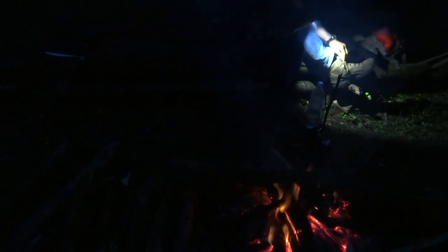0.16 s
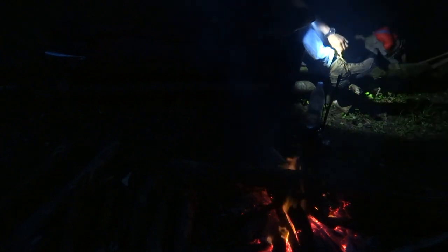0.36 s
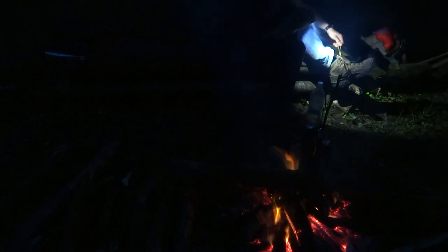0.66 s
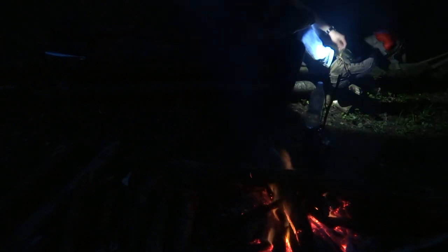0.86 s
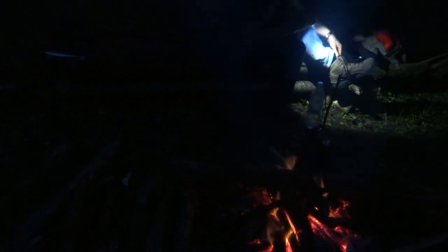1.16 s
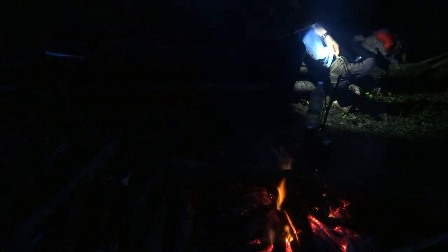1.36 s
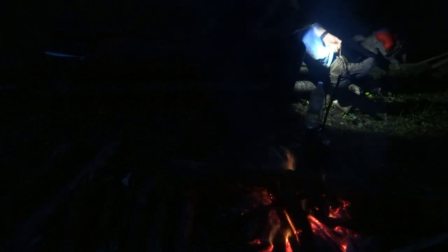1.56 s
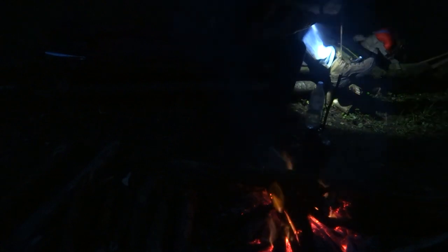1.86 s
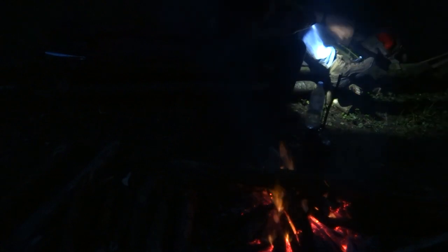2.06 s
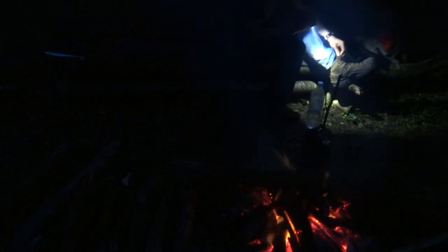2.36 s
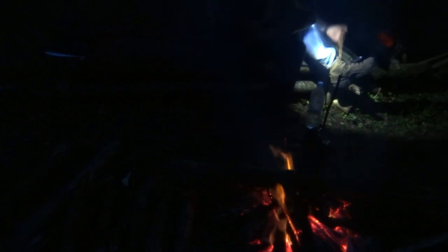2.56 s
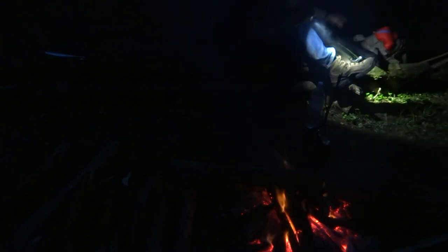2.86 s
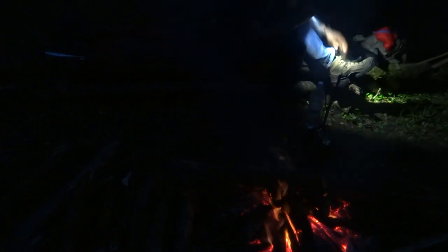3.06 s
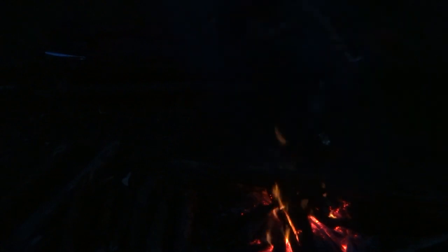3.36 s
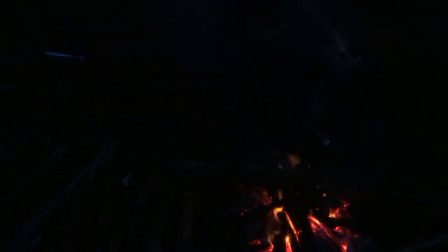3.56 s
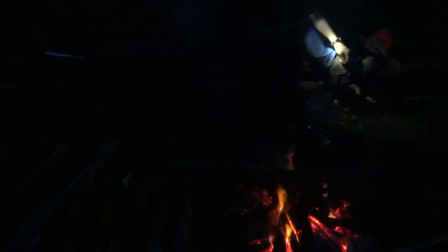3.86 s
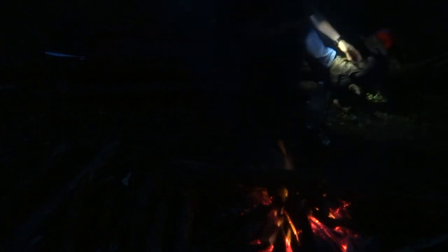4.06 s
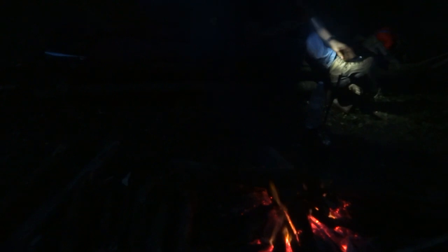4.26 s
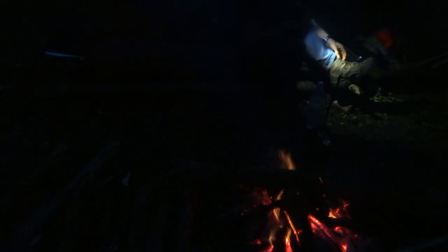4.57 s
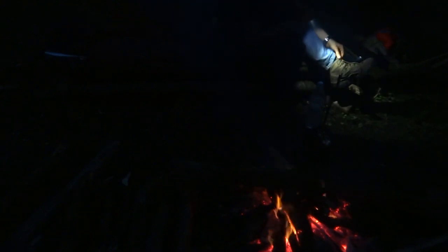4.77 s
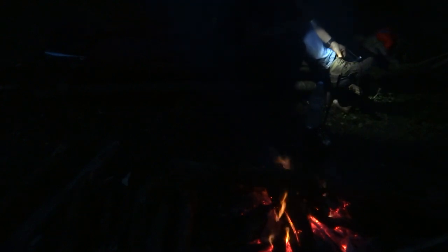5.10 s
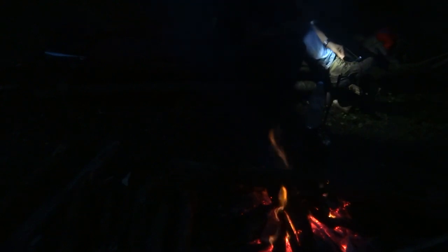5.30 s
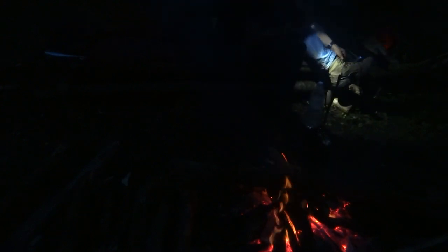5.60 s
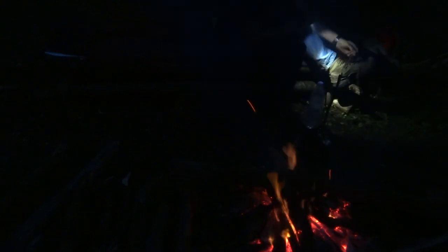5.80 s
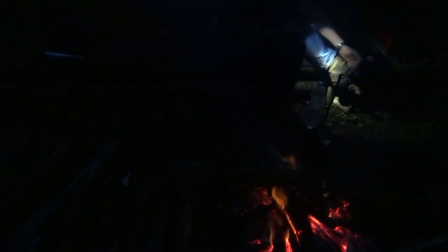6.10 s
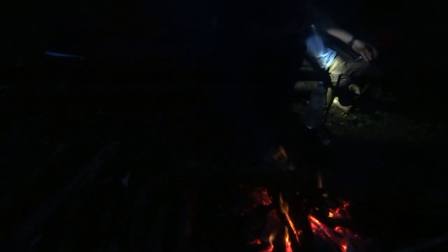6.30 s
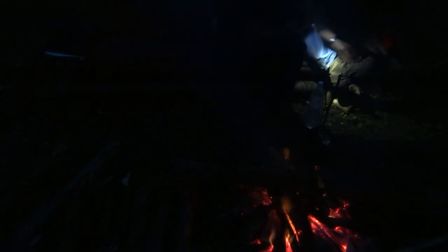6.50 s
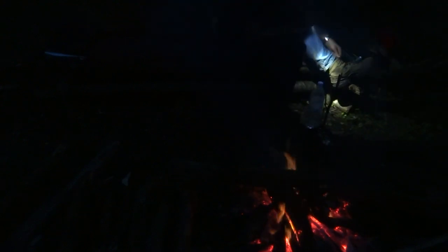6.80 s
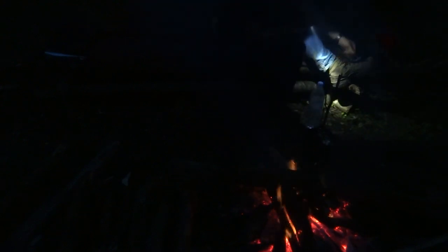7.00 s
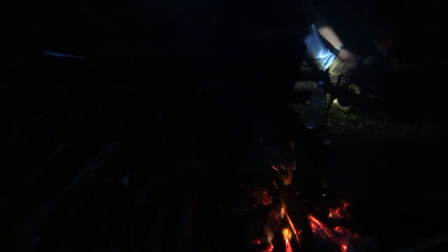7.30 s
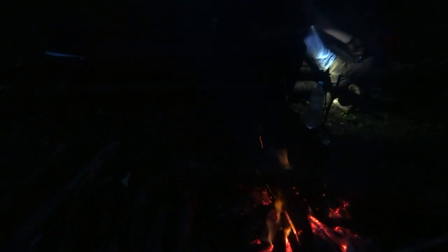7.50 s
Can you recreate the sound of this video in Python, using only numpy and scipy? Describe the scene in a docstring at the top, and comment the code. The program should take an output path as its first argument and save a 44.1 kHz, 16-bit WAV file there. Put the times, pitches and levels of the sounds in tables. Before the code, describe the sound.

A bird sings gliding, two-voiced whistles among echoing trees at night, beside a crackling fire with one very loud pop near the end.

```python
"""Dusk by a campfire in a wood: damp logs hiss, tick and pop close by; far off a nightjar churrs and an engine drones.
A far thrush on the right opens, mostly heard as scatter off the trunks; someone by the fire knocks and scuffs.
From about two to five seconds a near thrush on the left sings gliding, sometimes two-voiced notes.
The far thrush then takes over, and near seven seconds the loudest pop comes with a few more knocks.
Whistles are gliding sines, pops and knocks short rings and noise bursts, hiss and night air coloured noise."""
import sys
import numpy as np
from scipy import signal
from scipy.fft import rfft, irfft, next_fast_len
from scipy.io import wavfile
from scipy.ndimage import map_coordinates

SR = 44100
rng = np.random.default_rng(int(sys.argv[2]) if len(sys.argv) > 2 else 0)


def wav_out(sig):
    """Save sig, one row per channel (or a flat mono array), as 16-bit PCM at SR to the path in sys.argv[1]."""
    wavfile.write(sys.argv[1], SR, np.round(np.clip(np.atleast_2d(sig).T, -1, 1) * 32767).astype(np.int16))


N = 337365


def amp(db):
    """Decibels to gain."""
    return 10 ** (np.asarray(db) / 20)


def unit(x):
    """Scale to rms 1."""
    return x / np.sqrt(np.mean(x ** 2) + 1e-20)


def along(points, hz):
    """Read (frequency [Hz], value) points at hz, on a log frequency axis."""
    f, v = np.transpose(points)
    return np.interp(np.log(hz + 1), np.log(f + 1), v)


def curve(rows):
    """(time [s], value) rows as one value per sample."""
    return np.interp(np.arange(N) / SR, *np.transpose(rows))


def wobble(rate, size=N):
    """A smooth random curve, rate knots a second."""
    knots = rng.standard_normal(int(size * rate / SR) + 4)
    return map_coordinates(knots, [np.arange(size) * rate / SR])


def filtered(x, response):
    """x times a response of frequency, without added phase."""
    size = x.shape[-1]
    padded = next_fast_len(size + 8192)
    spectrum = rfft(x, padded) * response(np.fft.rfftfreq(padded, 1 / SR))
    return irfft(spectrum, padded)[..., :size]


def add(track, s, sound):
    """Mix a sound into a track at time s, cut off where the track ends."""
    part = track[max(round(s * SR), 0):][:len(sound)]
    part += sound[:len(part)]


def placed(x, left_db):
    """Mono to stereo, louder on the left by left_db."""
    return x * amp([[left_db / 2], [-left_db / 2]])


def rush(spectrum):
    """Stereo noise of rms 1 with the given colour; mid and side shares set how alike left and right are."""
    # how alike the two sides are: (frequency [Hz], left-right correlation)
    likeness = [(60, 0.99), (130, 1), (280, 0.49), (700, 0.35), (1500, 0.11), (3000, 0.58), (8000, 1),
                (12000, 1)]

    def colour(hz):
        turn = np.arccos(np.clip(along(likeness, hz), -1, 1)) / 2
        return amp(along(spectrum, hz)) * [np.cos(turn), np.sin(turn)]

    mid, side = filtered(rng.standard_normal((2, N)), colour)
    return unit(np.array([mid + side, mid - side]))


def forest(x, early_db, early_t60, width):
    """Echoes off trunks: a quick scatter from those close by, then a long tail from the whole wood."""
    # the wood's long tail: (frequency [Hz], time to fall 60 dB [s])
    wood_t60 = [(300, 0.99), (1500, 0.55), (3500, 1.34), (8000, 1.06), (14000, 0.93)]
    hz, t, cells = signal.stft(rng.standard_normal((2, SR)), SR, nperseg=256)
    late = amp(-60 * t / along(wood_t60, hz)[:, None])
    early = amp(early_db - 60 * t / early_t60)
    onset = 1 - np.exp(-t / 0.0009)
    tail = signal.istft(cells * (late + early) * onset, SR, nperseg=256)[1]
    tail = tail / np.linalg.norm(tail[0])
    mid, side = signal.fftconvolve(x[None], tail, axes=1)[:, :N]
    return np.array([mid + width * side, mid - width * side]) / np.hypot(1, width)


def night():
    """Low rumble, a wash of far birds and leaves as coloured noise, and a distant engine's orders as sines."""
    # orders of the engine: (frequency [Hz], level before a 2 dB lift [dB])
    engine_orders = [(46, -67), (92.2, -59.5), (115.3, -64)]
    # colour of the low rumble: (frequency [Hz], relative level [dB])
    air_colour = [(12, -41), (20, -10), (34, -13), (65, 0.5), (97, -1.5), (129, -4), (147, -9.5), (177, -9),
                  (364, -18.5), (572, -17.5), (774, -19), (855, -14), (1100, -23.5), (1430, -41),
                  (2420, -120)]
    # how loud the rumble is: (time [s], level [dB])
    rumble_level = [(0, -53.5), (1.5, -53), (3, -53.5), (7.6, -55.5)]
    # colour of the distant chorus: (frequency [Hz], relative level [dB])
    woods_colour = [(800, -6.5), (980, 7), (1200, -8.5), (1400, -7), (1650, -4.5), (1850, -6), (2250, 4),
                    (2800, -10), (4000, -2.5), (5500, -15), (9000, -43)]
    sway_db = .7  # drift of the night air, times a random curve
    turns = np.cumsum(1 + 0.0056 * wobble(4)) / SR  # the engine's speed wanders
    drone = np.zeros(N)
    for hz, db in engine_orders:
        level = amp(db + 2 + 1.34 * wobble(3.8))
        drone += level * np.sin(2 * np.pi * (hz * turns + rng.random()))
    rumble = amp(curve(rumble_level) + sway_db * wobble(3.71)) * rush(air_colour)
    chorus = amp(-60.0 + sway_db * wobble(3.03)) * rush(woods_colour)
    return drone + rumble + chorus


def nightjar(rate=25, pitch_hz=1555):
    """A faint churr: a wavering tone in short hollow pulses, rate a second, fading in and out with the air."""
    beat = np.cumsum(rate * (1 + .012 * wobble(5))) / SR
    pulses = (.5 + .5 * np.cos(2 * np.pi * beat)) ** 2
    tone = np.sin(2 * np.pi * np.cumsum(pitch_hz * (1 + .018 * wobble(120))) / SR)
    level_db = -63.7 + 1.5 * wobble(2) + 2 * wobble(20)
    return amp(level_db) * pulses * tone


def sizzle():
    """Damp logs hiss unsteadily: coloured noise with a restless level."""
    # how loud the hiss is: (time [s], level before a 2.5 dB lift [dB])
    hiss_level = [(0.0, -59.5), (0.74, -62.5), (1.68, -62.5), (5.01, -59.5), (5.09, -60.5), (6.6, -62),
                  (6.99, -61), (7.65, -59)]
    # colour of the hiss: (frequency [Hz], relative level [dB])
    hiss_colour = [(2500, -3), (5000, -2.5), (7500, 0.5), (10000, 1.5), (12000, 3), (13500, -0.5),
                   (15500, -12.5)]
    return amp(curve(hiss_level) + 2.5 + 1.3 * wobble(39)) * rush(hiss_colour)


def handling():
    """Soft wooden knocks, band-passed noise bursts that rebound once and thud on the ground, and a cloth scuff."""
    # dull knocks beside the fire: (time [s], peak level [dB], centre frequency [Hz])
    knocks = [(1.101, -42.5, 520), (1.8228, -36, 726), (1.836, -31.5, 620), (3.975, -37.5, 950),
              (4.045, -39.5, 1730), (5.588, -38, 780), (7.0621, -26.5, 864), (7.197, -36, 710),
              (7.316, -30.5, 805)]
    # cloth dragged over grass: (time [s], level [dB])
    scuff_level = [(1.56, -84), (1.65, -53), (1.74, -49.5), (1.82, -51.5), (1.86, -52), (1.94, -62.5),
                   (2.35, -79), (2.388, -46), (2.42, -81)]
    # colour of the cloth: (frequency [Hz], relative level [dB])
    cloth_colour = [(150, -16), (400, -16), (620, 8), (1000, 4), (1300, -11), (3200, 2), (6000, -12),
                    (11000, -5), (15000, -13)]
    rebound_s, rebound_db = 0.01, -15.5
    # the ground's thud grows faster than its knock
    thud_hz, thud_db, thud_grows, heavy_db = 244, -7.5, 1.17, -23
    out, t = np.zeros(N), np.arange(SR // 10) / SR
    rebounds = [(s + rebound_s, db + rebound_db, hz) for s, db, hz in knocks]
    thuds = [(s, heavy_db + thud_db + thud_grows * (db - heavy_db), thud_hz) for s, db, hz in knocks]
    for s, db, centre_hz in knocks + rebounds + thuds:
        burst = rng.standard_normal(len(t)) * amp(-60 * t / 0.047)
        edges_hz = [centre_hz * .55, centre_hz * 1.45]
        knock = signal.sosfilt(signal.butter(3, edges_hz, "band", fs=SR, output="sos"), burst)
        add(out, s, amp(db) * knock / np.abs(knock).max())
    scuff = amp(curve(scuff_level) + 1.4 * wobble(50.9)) * rush(cloth_colour)
    echoes = amp(-10) * forest(out, early_db=-17, early_t60=0.074, width=0.52)
    return out + echoes + scuff


def ring(modes):
    """The impulse answer of a few broad resonances, peak 1; so small a source radiates no bass."""
    t = np.arange(SR // 100) / SR
    wave = np.zeros(len(t))
    for hz, width, db in modes:
        wave += amp(db) * np.exp(-np.pi * width * t) * np.sin(2 * np.pi * hz * t)
    no_bass = signal.butter(3, modes[0][0] * .75, "high", fs=SR, output="sos")
    wave = signal.sosfilt(no_bass, wave)
    return wave / np.abs(wave).max()


def pops(count=110):
    """Steam bursts the wood in single snaps, over count tiny ticks; logs and trees throw them back."""
    # the loudest pops; the row at 7.069 is the big pop's echo off ground or log:
    # (time [s], peak level [dB], weight of the low ring [dB])
    loud_pops = [(0.0245, -24.5, 6), (.159, -24, -23), (.4254, -25.5, -16), (1.1616, -23, -17),
                 (1.2898, -20, -5.5), (1.6566, -21.5, -24), (2.1567, -11.5, -2), (2.611, -14, -15.5),
                 (2.6918, -25, 4), (3.219, -22, -10), (3.8703, -21, -30), (4.3276, -16.5, -37),
                 (5.9458, -15.5, -9), (7.063, -1, 7), (7.069, -11, -11), (7.394, -20, -2)]
    # snap, low ring and high ring of a pop, each: (frequency [Hz], width [Hz], relative level [dB])
    snap_modes = [(6730, 10500, 12.5), (11150, 1600, -0.5)]
    low_modes = [(3450, 2600, -0.5), (6130, 3100, -5.5)]
    high_modes = [(12570, 1100, 0)]
    # small cells ring high instead of low: dB gained per dB of low ring lost
    high_db, high_trade = -19.5, 0.7
    out, snap, low, high = np.zeros(N), ring(snap_modes), ring(low_modes), ring(high_modes)
    ticks = [(a * N / SR, -51 + 19 * b ** 4, -22 + 18 * c) for a, b, c in rng.random((count, 3))]
    for s, db, low_db in loud_pops + ticks:
        wave = snap + amp(low_db) * low + amp(high_db - high_trade * low_db) * high
        add(out, s, amp(db) * wave / np.abs(wave).max())
    t = np.arange(SR // 20) / SR
    logs = rng.standard_normal(len(t)) * (amp(-26 - 60 * t / .008) + amp(-36 - 60 * t / .05))
    out = out + signal.fftconvolve(out, logs)[:N]
    out = filtered(out, lambda hz: 1 / (1 + (hz / 14800) ** 24))
    trees = forest(out, early_db=6, early_t60=.35, width=.25)
    trees = filtered(trees, lambda hz: 1 / (1 + (hz / 10500) ** 8))  # the echoes come back duller
    return placed(out, -.9) + amp(-9) * trees


def slur(s, length, start_hz, held_hz, db, hoarse, glide_s=.018):
    """A note that slides to its pitch in glide_s and holds it: (time, pitch, level, strain)."""
    attack_s, release_s = 0.0087, 0.015
    softer_db = -1.5  # slurs are sung a little softer than shaped syllables
    t = np.arange(int(length * SR)) / SR
    rise_and_fall = np.minimum(t / attack_s, (length - t) / release_s)
    swell_db = 10 * np.log10(np.clip(rise_and_fall, 1e-6, 1))
    pitch = np.interp(t, [0, glide_s], [start_hz, held_hz])
    return s, pitch, db + softer_db + swell_db, np.clip(hoarse, 0, 1)


def syllable(shape, s, length, hz, db, hoarse):
    """A shape stretched to a length and set on a pitch: (time, pitch, level, strain)."""
    share, ratio, shape_db = np.transpose(shape)
    u = np.linspace(0, 1, int(length * SR))
    pitch = hz * np.interp(u, share, ratio)
    return s, pitch, db + np.interp(u, share, shape_db), np.clip(hoarse, 0, 1)


def song(notes, quaver, rasp, flutter_db, second_db, third_db):
    """Each note is a gliding whistle, strain adding harmonics; the two sides of the syrinx can sound at once."""
    out = np.zeros(N)
    waver, flutter, buzz = wobble(260), wobble(170), wobble(550)
    for s, pitch, level_db, strain in notes:
        now = np.minimum(round(s * SR) + np.arange(len(pitch)), N - 1)
        unsteady = 1 + quaver * waver[now] + rasp * strain * buzz[now]
        phase = 2 * np.pi * np.cumsum(pitch * unsteady) / SR
        overtones = amp(second_db) * np.sin(2 * phase) + amp(third_db) * np.sin(3 * phase)
        tone = np.sin(phase) + strain * overtones
        # a strained note flutters up to half as much again
        add(out, s, amp(level_db + flutter_db * (1 + strain / 2) * flutter[now]) * tone)
    return out


def far_thrush():
    """Slurred whistles from deep in the trees on the right, mostly arriving as scattered sound."""
    # (time [s], length [s], start pitch [Hz], held pitch [Hz], level before slur softening [dB], hoarseness [0-1])
    far_slurs = [(.275, 0.073, 2990, 3855, -50, .9), (.33, 0.037, 3350, 3510, -42, 0.13),
                 (.455, 0.095, 3530, 4220, -45, 0.44), (.61, 0.11, 2755, 2700, -48, 0.12),
                 (.73, 0.14, 2800, 3184, -55.5, 0.83), (1.03, 0.22, 8000, 7730, -53.5, .15),
                 (1.4, 0.054, 3620, 3830, -45, 0.67), (1.45, 0.096, 3500, 2783, -52.5, 0.98),
                 (5.241, 0.061, 7350, 6860, -52.5, 0.66), (5.328, 0.039, 6800, 4960, -44, 0.83),
                 (5.419, 0.048, 4850, 4747, -41.5, 0.32), (5.525, .15, 3980, 3590, -44, .45),
                 (5.98, .11, 5900, 6900, -48, 0.86), (6.317, 0.13, 2820, 3483, -42.5, 0.083),
                 (6.448, 0.2, 2786, 2570, -49.5, 0.34), (6.768, 0.088, 3384, 4300, -41, 0.99),
                 (7.58, .05, 7300, 7210, -55.5, 0.11)]
    notes = [slur(*row, glide_s=.028) for row in far_slurs]
    voice = song(notes, quaver=.004, rasp=.063, flutter_db=3.0, second_db=-40, third_db=-50)
    direct = amp(-7) * voice
    scattered = amp(3.0) * forest(voice, early_db=-13, early_t60=0.086, width=0.23)
    return placed(direct + scattered, -3.1)


def trunks(x, echo_db, count=7):
    """Single echoes off the ground and the nearest trunks, each at its own delay and side."""
    out = np.zeros((2, N))
    delays_s, sides_db = rng.uniform(.004, .05, count), rng.normal(0, 2, count)
    for delay, side in zip(delays_s, sides_db):
        out += placed(np.pad(x, (int(delay * SR), 0))[:N], side)
    return amp(echo_db) * out / np.sqrt(count)


def near_phrase():
    """Slurs, scoops, chords, squeaks and chips; each is loudest where its pitch meets the throat's resonance."""
    # the throat's resonance: (frequency [Hz], gain [dB])
    throat = [(2200, -16.5), (3000, -11), (3700, -1.5), (4550, -0.5), (5200, -9), (5700, -13), (6500, -3.5),
              (8500, -9.5)]
    # Shapes: (share of the length [0-1], pitch ratio, relative level [dB])
    scoop_shape = [(0, .92, -9), (.08, 1.01, -0.5), (.3, .975, 1), (.68, 1.015, -2.5), (.87, 1.11, -3),
                   (1, 1.15, -11)]  # holds, then flicks up
    chip_shape = [(0, .82, -10), (.1, .98, 3), (.19, 1.09, -5.5), (.33, .9, 0), (.5, .76, -8.5),
                  (1, .53, -8)]  # flicks up, then falls far
    squeak_hook = [(0, .94, -10), (.09, 1.07, -1), (.19, .82, 1), (.26, .815, 2), (.34, .825, -17)]  # a squeak opens with a dive
    squeak_upper = [(.38, 1.05, -13), (.46, 1.075, 6), (0.699, 1.08, -8.5), (.85, .96, 2), (1, .88, -9)]  # then one voice hangs and falls
    squeak_lower = [(0.378, .89, -11.5), (0.569, .975, 3), (.74, 1.02, -5.5)]  # while the other climbs to meet it
    # Levels of all the notes below stand before the throat, and before the softening of slurred voices.
    # slurs: (time [s], length [s], start pitch [Hz], held pitch [Hz], level [dB], hoarseness [0-1])
    near_slurs = [(2.262, .034, 3760, 3920, -55, 0.2), (2.968, 0.061, 8600, 7980, -41.5, 0.42),
                  (3.012, 0.038, 7980, 6820, -43, 1), (3.08, 0.13, 8000, 8010, -50, 0.2),
                  (3.161, 0.036, 6520, 6750, -37.5, 0.3), (3.183, 0.032, 6700, 4540, -35, 0.34),
                  (3.358, 0.15, 8000, 8000, -47.5, 0.2), (3.457, 0.04, 3600, 5650, -26.5, 0.54),
                  (3.563, 0.05, 3820, 3595, -29.5, 0.42), (3.568, .036, 2760, 3044, -31.5, .8),
                  (3.932, 0.1, 3860, 4390, -46, .9), (4.582, 0.046, 3924, 3760, -22.5, 0.54),
                  (4.925, .075, 5500, 5080, -38, 1)]
    # scoops and squeaks: (time [s], length [s], pitch [Hz], level [dB])
    scoops = [(2.692, 0.041, 3810, -45.5), (3.317, .058, 4430, -27.5), (3.483, .07, 3750, -27),
              (3.615, .034, 3772, -25)]
    squeaks = [(3.978, .135, 7930, -32), (4.321, .125, 8070, -30)]
    # two-voiced notes: (time [s], length [s], upper pitch [Hz], lower pitch [Hz], level [dB])
    chords = [(3.693, 0.034, 3797, 3220, -30), (3.735, 0.099, 3870, 3380, -32),
              (5.042, 0.13, 4245, 3634, -36)]
    lower_voice_db = -2
    # chips: (time [s], length [s], pitch [Hz], level [dB], level of the second voice [dB])
    chips = [(4.592, .1, 3770, -31, -30), (4.762, .072, 4330, -25.5, -29), (4.914, .08, 4467, -26, -26)]
    second_lag_s, second_length_s, second_start_hz, second_held_hz = 0.041, 0.026, 4380, 4120

    notes = [slur(*row) for row in near_slurs]
    notes += [syllable(scoop_shape, *row, hoarse=0.29) for row in scoops]
    for row in squeaks:
        for shape in (squeak_hook, squeak_upper, squeak_lower):
            notes.append(syllable(shape, *row, hoarse=0.56))
    for s, length, upper_hz, lower_hz, db in chords:
        notes.append(slur(s, length, upper_hz, upper_hz, db, hoarse=0.19))
        notes.append(slur(s, length, lower_hz, lower_hz, db + lower_voice_db, hoarse=0.19))
    for s, length, hz, db, second_db in chips:
        notes.append(syllable(chip_shape, s, length, hz, db, hoarse=0.84))
        notes.append(slur(s + second_lag_s, second_length_s, second_start_hz, second_held_hz,
                          second_db, hoarse=0.49))
    return [(s, pitch, db + along(throat, pitch), strain) for s, pitch, db, strain in notes]


def near_thrush():
    """Clear notes on the left, with single trunk echoes and the wood ringing behind them."""
    voice = song(near_phrase(), quaver=.007, rasp=.035, flutter_db=2.8, second_db=-23.5, third_db=-27)
    first_echoes = trunks(voice, echo_db=-14)
    tail = amp(-0.5) * forest(voice, early_db=7.5, early_t60=0.2, width=0.21)
    return placed(voice + first_echoes + tail, 1.56)


def scene():
    """The night, the fire and the birds together."""
    background = night() + nightjar()
    fireside = sizzle() + handling() + pops()
    return background + fireside + far_thrush() + near_thrush()


def record(dry):
    """The microphone chain cuts off steeply above its band limit."""
    top_hz = 15600
    return filtered(dry, lambda hz: 1 / (1 + (hz / top_hz) ** 80))


dry = scene()
out = record(dry)
wav_out(out)
```